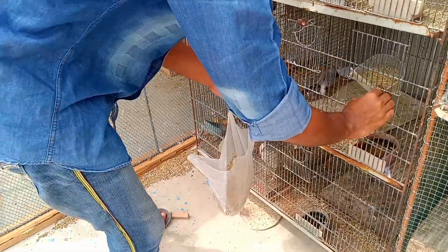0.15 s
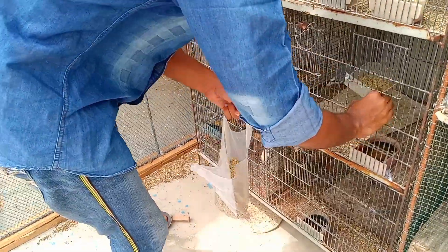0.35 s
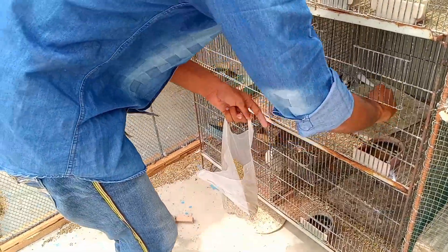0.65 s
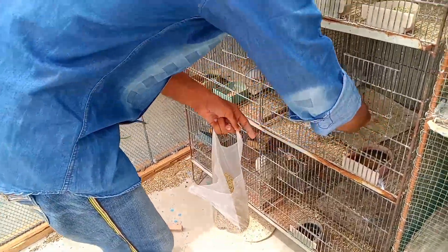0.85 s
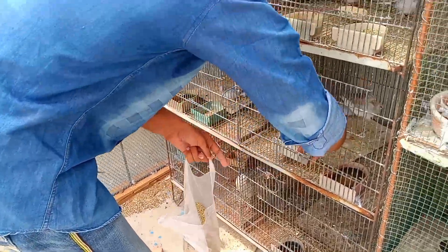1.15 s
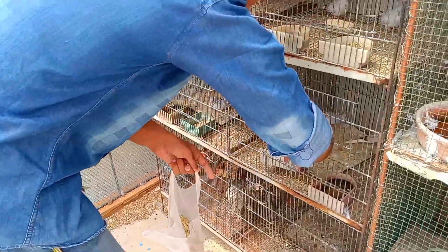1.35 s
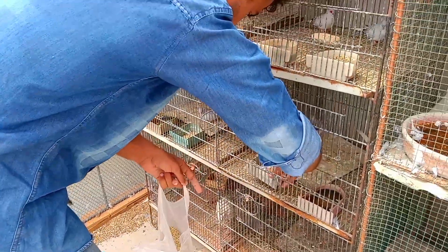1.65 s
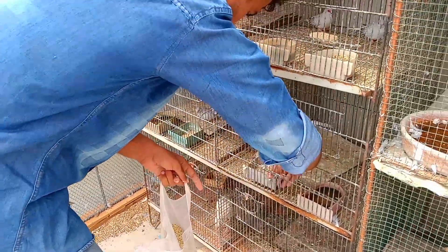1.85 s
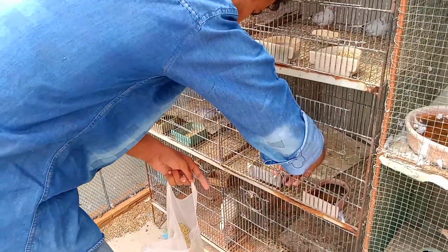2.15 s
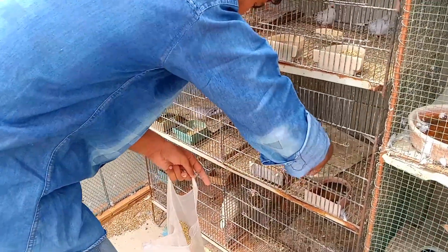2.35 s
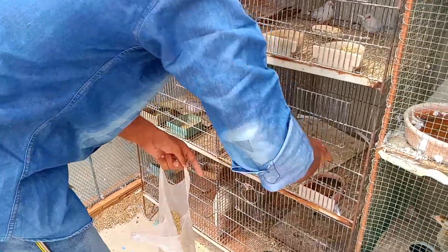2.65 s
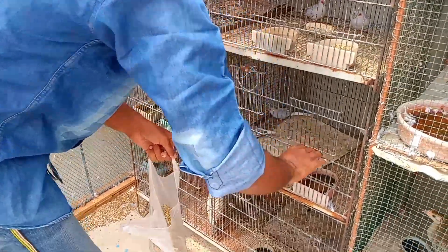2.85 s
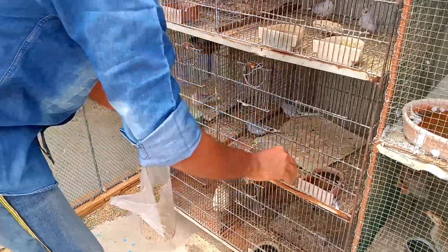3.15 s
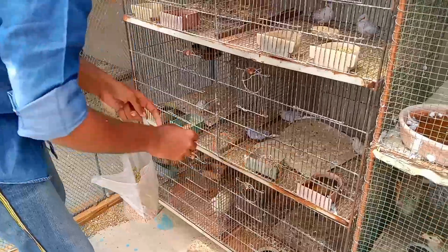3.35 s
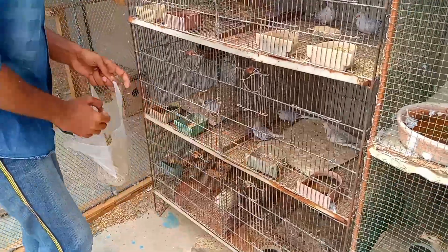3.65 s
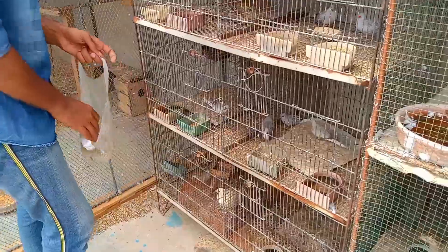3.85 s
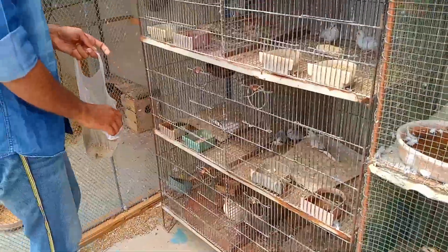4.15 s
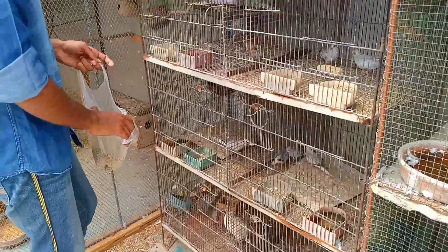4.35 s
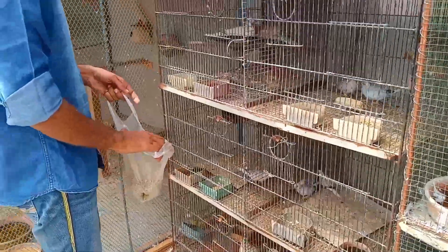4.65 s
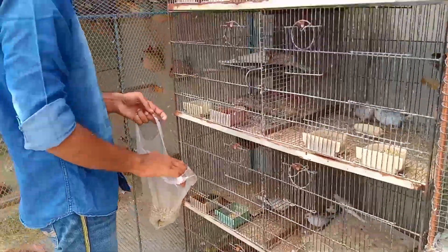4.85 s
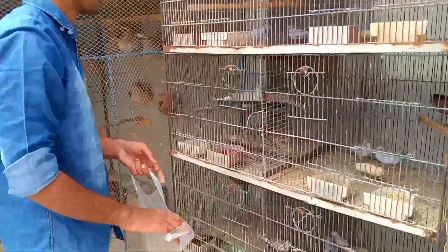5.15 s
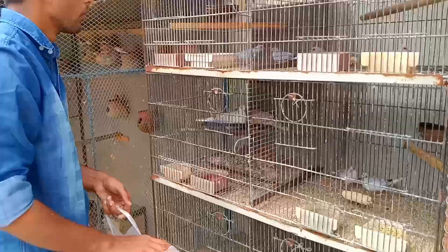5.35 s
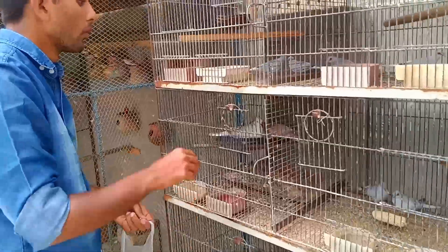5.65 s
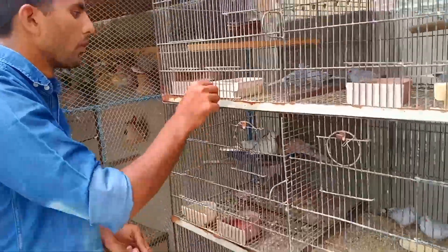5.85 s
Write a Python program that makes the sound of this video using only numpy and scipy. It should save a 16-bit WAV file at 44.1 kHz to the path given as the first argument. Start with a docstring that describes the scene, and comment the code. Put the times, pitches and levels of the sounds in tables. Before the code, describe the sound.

Light knocks on wire cages and faint bird calls, followed by a burst of wingbeats and four loud, high chirps nearby.

```python
"""A small hard-walled aviary at feeding time. A hand knocks the wire cages and slides a seed dish
while young birds beg and others whistle further off. Feet shuffle back, a bird bursts into a flurry
of wingbeats, and one close by gives four shrill chirps: each a falling note that breaks and flicks up.
Voices are wavering tones shaped by throat and beak, knocks make wires, frame and dish ring,
and wings, bumps and rubbing are short swells of noise."""
import sys
import numpy as np
from scipy import signal
from scipy.fft import rfft, irfft
from scipy.io import wavfile

SR = 44100
rng = np.random.default_rng(int(sys.argv[2]) if len(sys.argv) > 2 else 0)


def store_wav(level_fs):
    """Save 16-bit WAV to argv[1]."""
    pcm = np.round(np.clip(np.atleast_2d(level_fs), -1, 1) * 32767)
    wavfile.write(sys.argv[1], SR, pcm.T.astype(np.int16))


N = 264600
TIME = np.arange(N) / SR

# Levels are relative: the functions scale and mix them. t is a time, f a frequency.
# Tone colours, or how strong the lows and highs are: f/Hz, level/dB
AIR_COLOUR = [(20, -27), (45, -4), (95, 4.5), (250, -1.5), (700, -7), (1200, -4), (1750, 3.5), (2400, -0.5),
              (3800, -5), (4500, -22), (6000, -12), (7400, -10.5), (8300, -17.5), (9700, -43), (12000, -58),
              (16000, -79)]  # outdoor air and far birds
RUB_COLOUR = [(60, -22), (130, -11), (260, 0.5), (380, 7), (520, 0.5), (800, 1.5), (1100, -9.5),
              (1600, -4.5), (2400, -38), (4000, -74)]  # cloth and dish rubbing
HISS_COLOUR = [(3500, -41), (5000, -4.5), (7200, 2.5), (8200, -9), (9500, -18), (11500, -35), (15000, -36)]  # loose seed and breathy hiss
SCRAPE_COLOUR = [(400, -13), (900, -4), (1500, -2), (2100, -2), (3100, 2), (3800, 2), (4500, -12),
                 (5600, -4), (7100, 1.5), (8200, -11), (10500, -35), (15000, -69)]  # dish on wire
CRINKLE_COLOUR = [(2500, -9), (5000, -8), (7200, 1), (8400, -5), (9500, -20), (11000, -30), (15000, -50)]  # thin seed bag
PUFF_COLOUR = [(80, -11.5), (200, 3.5), (370, 7.5), (800, 2), (1200, -2), (2000, -22), (4000, -66)]  # air pushed by a wing
FEATHER_COLOUR = [(700, -60), (1500, 5.5), (2300, -2), (3400, 1), (4700, -15), (7200, -5), (8500, -20.5),
                  (11000, -43), (15000, -64)]  # rattling feathers
NESTLING_THROAT = [(1200, -32), (2000, -21.5), (2700, -13.5), (3350, -4), (4050, -6.5), (4650, -20.5),
                   (5400, -13), (6500, -26.5), (7600, -31.5), (9500, -64)]  # a young bird's throat and beak
CLOSE_THROAT = [(2000, 1.5), (3000, 3.5), (4300, 3), (5300, 3), (6300, -4.5), (7300, -3), (8200, 1.5),
                (9200, -4.5), (11000, -18), (14000, -41)]  # the close bird's throat and beak
CHIRP_COLOUR = [(1000, -48), (1700, -42), (2150, 1), (7600, -1), (8700, -23), (10500, -20.5),
                (11800, -25.5), (13000, -37), (15000, -69.5)]  # the chirps are cut below 2 kHz and grow dim above 8 kHz
PLAIN_THROAT = [(1500, 0), (6000, 0)]  # favours no pitch
THUD_COLOUR = [(30, -1), (80, 5.0), (300, -5), (700, -36.5), (2000, -40.5)]  # a soft push

# Echoes from nearby shelves and walls: delay/s, level/dB
WALL_ECHOES = [(.0031, -20.5), (.0074, -16), (0.013, -17.5), (0.028, -26.5)]
# Soft bumps of feet, and of the arm on the cage: t/s, level/dB, f/Hz
BUMPS = [(0.357, -39.5, 101), (1.22, -50.5, 100), (1.331, -64, 520), (1.372, -43.5, 326), (1.677, -40, 380),
         (2.061, -39, 126), (2.11, -31, 111), (3.01, -36, 430), (3.228, -28, 135), (3.296, -25.5, 122),
         (3.365, -39.5, 110), (3.586, -30, 128), (3.638, -36.5, 115), (4.105, -25.5, 129),
         (5.141, -33, 126), (5.214, -37.5, 97), (5.394, -43, 110), (5.563, -39, 108), (5.608, -51, 460)]
# Cloth and dish rubs, then short hisses, from shifts of loose seed and from the young birds' breathy begging:
# peak t/s, level/dB, decay/s
RUB_MOVES = [(.15, -35.5, 0.037), (.29, -49, .02), (.42, -39, 0.03), (1.18, -52, 0.068),
             (1.345, -37, 0.078), (1.68, -41, 0.059), (2.28, -41.5, .14), (2.62, -34.5, 0.013),
             (2.93, -43, 0.12), (3.025, -30.5, 0.022), (3.19, -37.5, 0.094), (3.64, -44, 0.031),
             (3.76, -38, 0.026)]
HISS_MOVES = [(0, -39, 0.013), (.2, -45, .03), (.63, -44, 0.08), (1.05, -48.5, .07), (1.345, -45, 0.032),
              (1.78, -56, 0.045), (2.17, -51.5, 0.15), (2.87, -45, 0.042), (3.1, -30, 0.03),
              (3.65, -63, 0.092), (3.88, -56, 0.14)]
# Knocks on the cage: t/s, wire level/dB, dish level/dB, frame level/dB, dish f/Hz
CAGE_HITS = [(0.06, -21, -47, -42, 1110), (0.0692, -35, -46, -29.5, 1270), (.077, -61, -39, -59, 1206),
             (0.24, -25, -32, -36, 1117), (.353, -22.5, -77, -38.5, 1360), (.4678, -33.5, -51, -50, 1425),
             (1.293, -32.5, -42, -39, 966), (1.6666, -44, -54, -52, 640), (1.7517, -62, -44, -80, 817),
             (1.7963, -41, -49.5, -44.5, 840), (1.831, -43, -48.5, -50, 810), (1.94, -46.5, -61, -55, 1380),
             (2.426, -37.5, -53.5, -38.5, 501), (2.592, -20.5, -28.5, -32, 806),
             (3.745, -38.5, -68, -49, 814), (3.849, -37.5, -54, -53, 940), (4.272, -15.5, -76, -32, 1400),
             (4.2937, -22.5, -47, -34, 1220)]
# Ringing tones of the wires, then the frame (narrow ones ring longer): f/Hz, width/Hz, level/dB
WIRE_TONES = [(5300, 340, -41), (6260, 260, -2), (6620, 270, 17), (7210, 140, 18.5), (7300, 130, -28)]
FRAME_TONES = [(1490, 46, 4.4), (2240, 40, 10), (2780, 750, 7.6), (3540, 97, 9.8)]
# Ringing tones of the hollow dish: multiple of its pitch, width/Hz, level/dB
DISH_TONES = [(.52, 93, -5.5), (1.001, 66.5, 6), (1.429, 160, -6)]
# Wing strokes: t/s, air level/dB, air f/Hz, feather level/dB, swell/s
WING_STROKES = [(3.948, -26, 790, -42, 0.0029), (3.958, -27.5, 274, -24.5, 0.0048),
                (3.97, -25, 790, -31, 0.002), (4.006, -13.5, 365, -24, 0.008),
                (4.035, -31.5, 410, -39, 0.01), (4.064, -29.5, 396, -33, 0.011),
                (4.121, -29, 447, -36, 0.011), (4.141, -30, 730, -47, 0.0055),
                (4.224, -37, 372, -44.5, 0.055), (4.29, -45.5, 640, -40, 0.022)]
# Thin whistles, then nasal begging calls:
# t/s, length/s, middle f/Hz, glide/share of pitch, level/dB, roughness (0-1)
WHISTLE_CALLS = [(-.02, 0.057, 2276, 0.033, -35.5, 0.54), (.624, .016, 3180, .3, -39, 0.53),
                 (.63, 0.055, 3720, -.02, -32, .35), (1.36, 0.17, 1850, -0.03, -42.5, 0.28),
                 (1.455, 0.076, 5380, -.025, -42.5, 0.08), (1.5, .045, 4450, -.14, -39, .25),
                 (1.54, 0.029, 5600, 0.059, -47, 0.34), (1.68, 0.064, 3320, -0.14, -45.5, 0.18),
                 (1.91, 0.21, 1799, 0.059, -41.5, 0.23), (2.395, 0.043, 3496, 0.18, -37, 0.29),
                 (2.556, .028, 3720, 0.048, -33, 0.3), (2.61, .17, 1757, -0.043, -43.5, 0.23),
                 (3.02, 0.043, 3050, -0.29, -35, 0.5), (3.506, 0.014, 3043, -0.13, -33.5, 0.31),
                 (3.795, .015, 3130, -.19, -45.5, 0.3), (3.88, 0.42, 2262, 0.036, -41, 0.57),
                 (4.8, 0.3, 2320, 0.02, -35, 0.17), (4.8, .2, 2045, 0.16, -43.5, 0.38),
                 (5.05, .15, 1913, -0.21, -41, 0.3), (5.62, .27, 1660, -.16, -50, .35)]
BEGGING_CALLS = [(-.04, 0.071, 592, -0.069, -36, 0.57), (.16, 0.17, 523, 0.013, -45.5, 0),
                 (.38, 0.14, 845, 0.022, -43, 0.17), (.485, 0.1, 820, -.06, -37, 0.03),
                 (.71, .27, 668, .05, -40.5, 0.02), (1, .13, 757, -0.081, -36.5, 0.37),
                 (1.18, 0.096, 743, 0.091, -44, 0.37), (1.32, .1, 720, -.05, -41, .45),
                 (2, 0.34, 694.6, .1, -39, 0.08), (2.22, .17, 652, -0.13, -36.5, 0.42),
                 (5.13, 0.064, 703, 0.053, -32.5, 0.48)]
# Close chirps. The fall: t/s, length/s, first f/Hz, last f/Hz, bend (+ drops early, - late),
# scoop into the note/share of pitch, sway/share of pitch, level/dB, opening accent/dB,
# mid-note overtones/dB, roughness (0-1). The flick: top f/Hz, last f/Hz, rise/s, length/s, level/dB
CLOSE_CHIRPS = [(4.435, 0.094, 2690, 2170, .3, .08, .035, -16, 3, 12.5, 0.067, 6330, 5030, .013, .056, -18),
                (4.688, 0.088, 2982, 2282, 0.9, -.08, .012, -15, 5, -0.5, .13, 5870, 5780, .018, .032, -13.5),
                (4.949, .080, 3280, 2665, 4, .2, .005, -16.5, 18, 21, 0.029, 6450, 6160, .026, .042, -14),
                (5.226, 0.072, 3420, 2650, -.5, -.12, .018, -13.5, -2, 7, 0.12, 6305, 5800, .028, .04, -12.5)]


def from_db(db):
    """Turn decibels into a number to multiply by."""
    return 10 ** (np.asarray(db) / 20)


def rms_one(x):
    """Scale a sound to an average power of 1."""
    return x / np.sqrt(np.mean(x ** 2) + 1e-20)


def at_hz(points, hz):
    """Look up a tone colour's level in dB at a frequency."""
    f, db = np.transpose(points)
    return np.interp(np.log(hz), np.log(f), db)


def colour(x, spectrum):
    """Turn a sound's lows and highs up or down to follow a tone colour."""
    hz = np.maximum(np.fft.rfftfreq(N, 1 / SR), 1)
    return irfft(rfft(x) * from_db(at_hz(spectrum, hz)), N)


def noise(spectrum):
    """Noise of power 1 with the given tone colour."""
    return rms_one(colour(rng.standard_normal(N), spectrum))


def wander(rate):
    """A smooth random wobble of size about 1; a higher rate in Hz makes it quicker."""
    r = np.exp(-2 * np.pi * rate / SR)
    return rms_one(signal.lfilter([1], [1, -2 * r, r * r], rng.standard_normal(N)))


def resonate(x, hz, width):
    """Let a sound ring at one pitch."""
    r = np.exp(-np.pi * width / SR)
    feedback = [1, -2 * r * np.cos(2 * np.pi * hz / SR), r * r]
    return signal.lfilter(np.array([1, 0, -1]) * (1 - r * r) / 2, feedback, x + 1e-18)


def ring(force, tones):
    """A struck object rings at several pitches at once."""
    power = sum(from_db(2 * db) * np.pi * width / SR / 2 for hz, width, db in tones)
    return sum(from_db(db) * resonate(force, hz, width) for hz, width, db in tones) / np.sqrt(power)


def burst(at, swell_s, decay_s):
    """A loudness curve that swells to a peak and dies away."""
    distance = np.where(TIME < at, (at - TIME) / swell_s, (TIME - at) / decay_s)
    return np.exp(-np.minimum(distance, 40))


def movements(table, swell_share):
    """The loudness of a series of movements; a slow one both swells and dies slowly."""
    return sum(from_db(db) * burst(at, swell_share * decay, decay) for at, db, decay in table)


def span(start, end, edge_s):
    """The samples that a note covers, and a curve that fades it in and out."""
    i = np.flatnonzero((TIME >= start) & (TIME < end))
    to_edge = np.minimum(TIME[i] - start, end - TIME[i])
    return i, np.sin(np.pi / 2 * np.clip(to_edge / edge_s, 0, 1))


def bird_voice(pitch, waver, throat, harmonics, overtones_db=0):
    """A membrane vibrates at a wavering pitch and its multiples; throat and beak colour the sound."""
    k = np.arange(1, harmonics + 1)[:, None]
    gains = from_db(at_hz(throat, k * pitch) + overtones_db * (k > 1)) * (k * pitch < SR / 2)
    phase = 2 * np.pi * np.cumsum(pitch * np.exp(waver)) / SR
    return np.sum(gains * np.sin(k * phase), axis=0) / np.sqrt(np.sum(gains ** 2, axis=0) / 2)


def arched_calls(table, throat, jitter, fade_share, harmonics, sag_per_s=0.28):
    """Each call glides in pitch and sags at both ends; a rough one wavers quickly."""
    out = np.zeros(N)
    chaos, sway, effort = wander(140), 0.0048 * wander(34), from_db(2.83 * wander(40))
    for start, length, hz, glide, db, rough in table:
        i, fade = span(start, start + length, edge_s=fade_share * length)
        from_middle = (TIME[i] - start) / length - .5
        pitch = hz * (1 + glide * from_middle - sag_per_s * length * (2 * from_middle) ** 2)
        waver = sway[i] + jitter * rough * chaos[i]
        out[i] += from_db(db) * fade * effort[i] * bird_voice(pitch, waver, throat, harmonics)
    return out


def aviary(x, tail_db, die_away_s=0.35):
    """Hard walls send back a few clear echoes, then a short blur of many more."""
    t = TIME[:SR]
    tail = rng.standard_normal(SR) * from_db(-60 * t / die_away_s) * np.clip(t / 0.0019, 0, 1)
    response = from_db(tail_db) * tail / np.linalg.norm(tail)
    response[0] += 1  # the direct sound
    for delay, db in WALL_ECHOES:
        response[int(delay * SR)] += from_db(db)
    return signal.fftconvolve(x, response / np.linalg.norm(response))[:N]


def open_air(level_db=-50.5):
    """Outdoor air and far birds blend into an almost steady hush."""
    return from_db(level_db + 0.09 * wander(2.3)) * noise(AIR_COLOUR)


def far_flock(quietest_db=-59, low_hz=1500, high_hz=2800, count=110):
    """Birds in the other cages twitter at random, each note a shallow arch."""
    calls = []
    for when, length, height, slope, loud in rng.random((count, 5)):
        hz = low_hz * (high_hz / low_hz) ** height
        calls.append((5.3 * when, 0.0463 + 0.12 * length, hz, -.18 * slope, quietest_db + 3 * loud, .5))
    return arched_calls(calls, PLAIN_THROAT, jitter=0.13, fade_share=0.4, harmonics=1)


def whistlers():
    """Birds further off peep and whistle, each call one thin tone."""
    return arched_calls(WHISTLE_CALLS, PLAIN_THROAT, jitter=.14, fade_share=0.2, harmonics=1)


def nestlings(hoarse_share=0.26, grit_hz=350):
    """Young birds beg in nasal calls; uneven air flow makes them hoarse."""
    calls = arched_calls(BEGGING_CALLS, NESTLING_THROAT, jitter=0.0876, fade_share=0.22, harmonics=14)
    return calls * (1 + hoarse_share * wander(grit_hz))


def bag_rustle(level_db=-46, grain_db=4, clump_db=3):
    """The thin seed bag crinkles in clumps as the hand leaves it."""
    crinkle = from_db(level_db + grain_db * wander(150) + clump_db * wander(17))
    return burst(at=5.56, swell_s=.03, decay_s=0.072) * crinkle * noise(CRINKLE_COLOUR)


def thuds(decay_s=0.029, width_hz=60):
    """Shoes on the floor and the arm against the cage make soft, low bumps."""
    out, push = np.zeros(N), noise(THUD_COLOUR)
    for at, db, hz in BUMPS:
        out += from_db(db) * burst(at + 0.0066, 0.0074, decay_s) * rms_one(resonate(push, hz, width_hz))
    return out


def dish_handling(rub_db=-2, hiss_db=-3, slide_db=-31, grain_db=2, patchy_db=4):
    """Cloth and dish rub dully, loose seed and the young birds' breath hiss, and the dish scrapes out across
    the wires."""
    grain = rms_one(from_db(grain_db * wander(180)))
    friction = noise(RUB_COLOUR)
    # the hollows of the cage answer the rubbing, each growing and fading by chance
    hollows = sum((-1) ** k * resonate(friction, hz, hz / 4) * from_db(patchy_db * wander(23))
                  for k, hz in enumerate(np.geomspace(150, 1600, 10)))
    rub = from_db(rub_db) * movements(RUB_MOVES, swell_share=0.51) * rms_one(hollows)
    hiss = from_db(hiss_db) * movements(HISS_MOVES, swell_share=0.43) * noise(HISS_COLOUR)
    slide = from_db(slide_db) * burst(at=3.08, swell_s=0.078, decay_s=0.055) * noise(SCRAPE_COLOUR)
    return rub + grain * (hiss + slide)


def cage_knocks(scrape_s=0.0036, chatter_s=0.0094, dish_decay_s=0.013, grain_db=3):
    """Each knock is a brief scrape and a chatter of tiny hits that ring wires, frame and dish."""
    out = np.zeros(N)
    times, wire_db, dish_db, frame_db, dish_hz = np.transpose(CAGE_HITS)
    for tones, levels in ((WIRE_TONES, wire_db - 9), (FRAME_TONES, frame_db + 2)):
        chatter = rms_one(rng.standard_normal(N) * from_db(grain_db * wander(360)))
        hits = sum(from_db(db) * burst(at, scrape_s, chatter_s) for at, db in zip(times, levels))
        out += ring(chatter * hits, tones)
    for at, db, hz in zip(times, dish_db + 3, dish_hz):
        force = from_db(db) * burst(at, 0.00018, dish_decay_s) * chatter
        out += ring(force, [(ratio * hz, width, level) for ratio, width, level in DISH_TONES])
    return signal.sosfilt(signal.butter(6, 8700, fs=SR, output="sos"), out)


def wings(decay_s=0.019, flutter_db=3, puff_width_hz=130):
    """Each stroke shoves a hollow puff of air while the feathers rattle."""
    air, rattle, rush = np.zeros(N), np.zeros(N), noise(PUFF_COLOUR)
    for at, air_db, hz, feather_db, swell_s in WING_STROKES:
        stroke = burst(at, swell_s, decay_s)
        puff = rms_one(resonate(rush, hz, puff_width_hz))
        air += from_db(air_db) * stroke * rms_one(puff + rush)
        rattle += from_db(feather_db) * stroke
    return air + rattle * noise(FEATHER_COLOUR) * from_db(flutter_db * wander(150))


def chirp_fall(t, length, first, last, bend, scoop, sway, db, accent_db, overtones_db, rough):
    """A chirp's first part sinks in steps, brightens in the middle and breaks up at its end."""
    attack_s, scoop_s, accent_s, release_s = 0.013, 0.00789, 0.017, 0.0032
    break_s, break_rough, break_sag, break_db = 0.0176, 1.57, 0.0786, -2.5
    step_hz, edge_overtones_db = 29, -1.5
    progress = t / length
    broken = np.clip(1 - (length - t) / break_s, 0, 1)
    glide = first + (last - first) * np.expm1(-bend * progress) / np.expm1(-bend)
    steps = sway * np.cos(2 * np.pi * step_hz * t)
    pitch = glide * (1 + scoop * np.exp(-t / scoop_s) + steps - break_sag * broken)
    fade = np.clip(np.minimum(t / attack_s, (length - t) / release_s), 0, 1)
    gain = fade * from_db(db + accent_db * np.exp(-t / accent_s) + break_db * broken)
    bright_db = edge_overtones_db + (overtones_db - edge_overtones_db) * np.sin(np.pi * progress) ** 4
    return pitch, gain, rough + (break_rough - rough) * broken, bright_db


def chirp_flick(t, top, last, rise, from_hz=3700, settle_s=0.013, clear_s=0.013):
    """A chirp's last part shoots up in pitch, loses its roughness and settles lower."""
    climb = np.sin(np.pi / 2 * np.clip(t / rise, 0, 1))
    droop = 1 - np.exp(-np.maximum(t - rise, 0) / settle_s)
    pitch = from_hz + (top - from_hz) * climb + (last - top) * droop
    return pitch, 1.35 * np.exp(-t / clear_s)


def close_chirps(fall_jitter=0.081, flick_jitter=0.196, trill_hz=175, trill_depth=0.28, warble_hz=62):
    """A trilled, rasping note falls and breaks, then the voice jumps up and clears as it rises."""
    out = np.zeros(N)
    chaos, shake, grit_db = wander(1200), wander(396), 2.8 * wander(320)
    trill = np.sin(2 * np.pi * trill_hz * TIME + wander(33))
    for start, length, *fall, top, last, rise, flick_length, flick_db in CLOSE_CHIRPS:
        i, fade = span(start, start + length, edge_s=0.0017)
        pitch, gain, rough, overtones_db = chirp_fall(TIME[i] - start, length, *fall)
        waver = rough * (fall_jitter * rough * chaos[i] + trill_depth * (1 - rough) * trill[i])
        rasp = 0.027 * np.sqrt(rough) * shake[i]
        warble = 0.018 * np.sin(2 * np.pi * warble_hz * TIME[i] + chaos[i[0]])
        throb_db = 6 * rough * (1 - rough) * trill[i] + grit_db[i]
        voice = bird_voice(pitch, waver + rasp + warble, CLOSE_THROAT, 5, overtones_db)
        out[i] += fade * gain * from_db(throb_db) * voice

        jump = start + length - 0.0068  # the flick starts inside the break
        i, fade = span(jump, jump + flick_length, edge_s=.006)
        pitch, rough = chirp_flick(TIME[i] - jump, top, last, rise)
        waver = flick_jitter * rough * chaos[N - 1 - i] + 0.0058 * shake[i]
        voice = bird_voice(pitch, waver, CLOSE_THROAT, harmonics=2)
        out[i] += fade * from_db(flick_db + grit_db[i]) * voice
    return colour(out, CHIRP_COLOUR)


def scene():
    """Birds and the keeper's noises echo in the aviary over the open air, in one channel."""
    calls = nestlings() + whistlers()
    chirps = aviary(from_db(-0.53) * close_chirps(), tail_db=-2)
    other_birds = aviary(calls + far_flock(), tail_db=-3)
    noises = aviary(cage_knocks() + wings() + thuds() + dish_handling() + bag_rustle(), tail_db=-10)
    return (open_air() + other_birds + noises + chirps)[None]


def record(dry, cutoff_hz=14500):
    """Cut away the very highest treble."""
    return signal.sosfilt(signal.cheby2(12, 70, cutoff_hz, fs=SR, output="sos"), dry)


dry = scene()
out = record(dry)
store_wav(out)
```